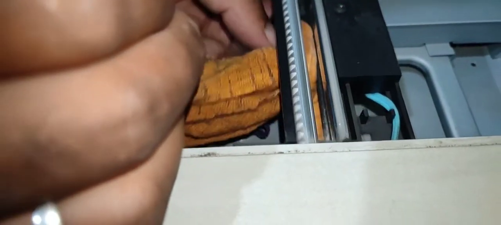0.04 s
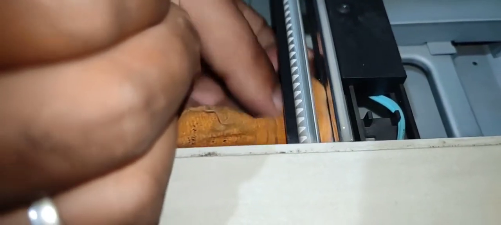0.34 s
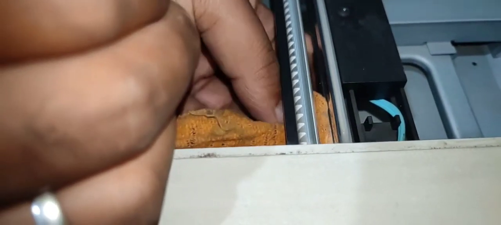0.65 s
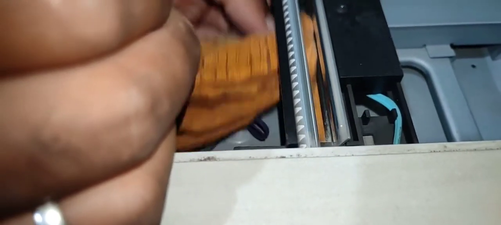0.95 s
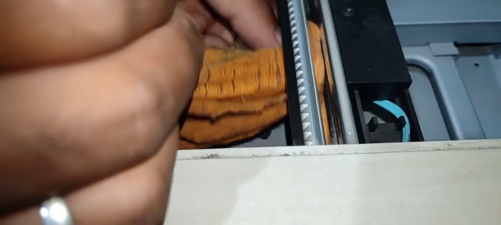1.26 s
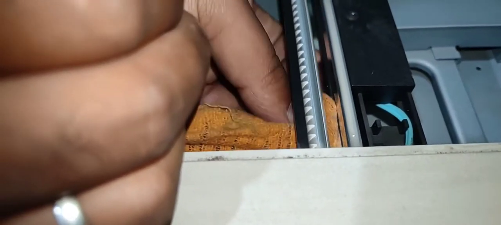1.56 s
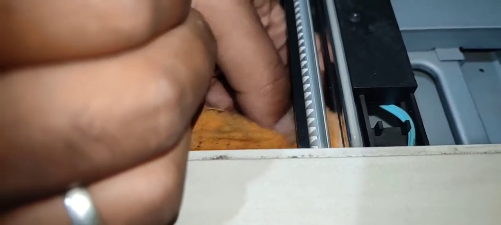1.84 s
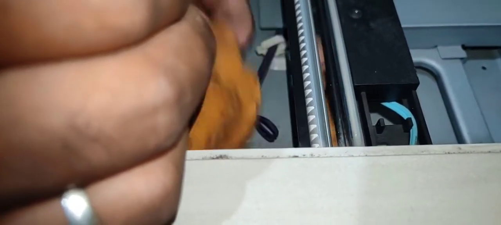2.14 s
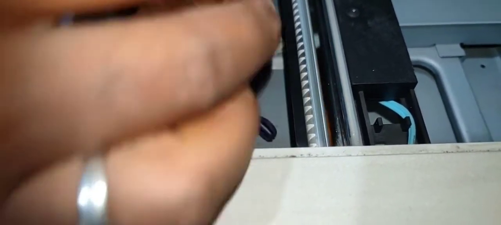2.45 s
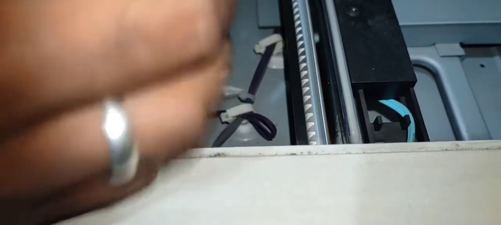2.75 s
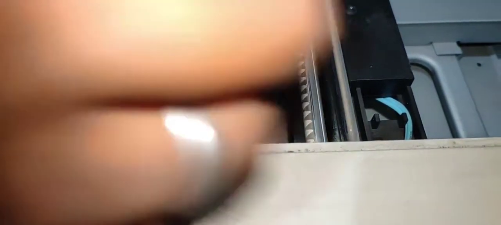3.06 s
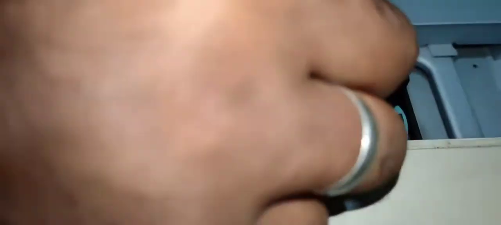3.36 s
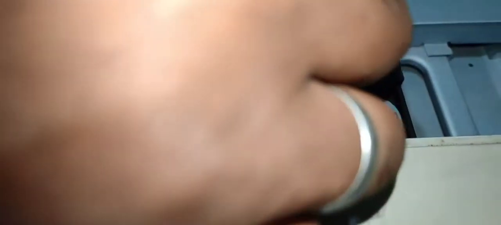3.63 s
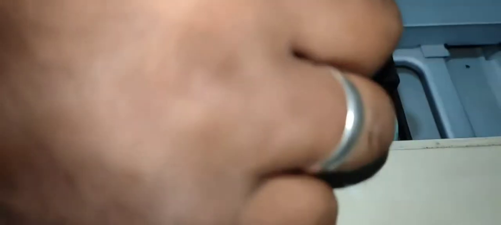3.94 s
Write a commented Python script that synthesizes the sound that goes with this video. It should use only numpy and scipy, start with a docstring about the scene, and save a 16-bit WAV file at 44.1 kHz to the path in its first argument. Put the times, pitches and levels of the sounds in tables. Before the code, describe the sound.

Three plastic knocks and cloth swishes inside an office machine, then faint rustling over a hum.

```python
"""A cloth is pushed to and fro inside an opened copier, close to the microphone.
A motor, perhaps a room fan, hums from the start and throughout. Three firm strokes come about half a
second apart: each knocks a loose plastic part against the chassis, then rubs on between the hollow walls.
The first ends in a light tick. From 1.6 s the cloth is drawn out, with faint rustles and a tick at 2.4 s."""
import sys
import numpy as np
from scipy import signal
from scipy.fft import rfft, irfft, next_fast_len
from scipy.io import wavfile
from scipy.ndimage import map_coordinates

SR = 44100
rng = np.random.default_rng(int(sys.argv[2]) if len(sys.argv) > 2 else 0)


def digitize_waveform(pressure):
    """Quantize a signal to 16-bit integers and store it at the path in sys.argv[1].

    Rows of a 2-D input are taken as channels; values are limited to [-1, 1].
    """
    field = np.atleast_2d(pressure).T
    bounded = np.clip(field, -1, 1)
    quanta = np.round(bounded * 32767).astype(np.int16)
    wavfile.write(sys.argv[1], SR, quanta)


N = 4 * SR


def amp(db):
    """Decibels to gain."""
    return 10 ** (np.asarray(db) / 20)


def unit(x):
    """Normalise to rms 1."""
    return x / np.sqrt(np.mean(x ** 2) + 1e-20)


def along(points, hz):
    """Read a curve of (Hz, value) points on a log frequency axis."""
    freqs, values = np.transpose(points)
    return np.interp(np.log(hz + 1), np.log(freqs + 1), values)


def wobble(per_s):
    """Smooth random modulation with per_s new values a second."""
    return map_coordinates(rng.standard_normal(int(N * per_s / SR) + 4), [np.arange(N) * per_s / SR])


def fade(t, t60):
    """Exponential decay, 60 dB down after t60 seconds."""
    return np.exp(-np.log(1000) * t / t60)


def add(out, start, sound):
    """Mix a sound in at start seconds."""
    part = out[:, max(round(start * SR), 0):][:, :sound.shape[-1]]
    part += sound[..., :part.shape[1]]


def equalise(x, response):
    """Apply an EQ given as gain against frequency."""
    size = x.shape[-1]
    padded = next_fast_len(size + 4096)
    return irfft(rfft(x, padded) * response(np.fft.rfftfreq(padded, 1 / SR)), padded)[..., :size]


# Stereo image. Each row: frequency in Hz, left-right correlation.
STEREO_LIKENESS = [(30, 0.89), (120, 0.76), (330, 0.8), (700, 0.27), (1300, 0)]
def width(hz):
    """Mid-side angle in radians: narrow bass, wide treble."""
    return np.arccos(along(STEREO_LIKENESS, hz)) / 2


def coloured(white_pair, spectrum, tilt_db=0):
    """Shape two white signals into stereo of rms 1, tilted by tilt_db per octave above 1 kHz."""
    def response(hz):
        gain = amp(along(spectrum, hz) + tilt_db * np.log2(np.maximum(hz, 1000) / 1000))
        return gain * [np.cos(width(hz)), np.sin(width(hz))]
    mid, side = equalise(white_pair, response)
    return unit(np.array([mid + side, mid - side]))


# The motor's swells. Each row: time in seconds, fundamental in dB, octave in dB.
HUM_SWELLS = [(0, -56, -46), (.32, -70, -54.5), (.48, -55, -44.5), (.62, -51.5, -51.5), (1.02, -48, -43.5),
              (1.35, -44.5, -46.5), (1.551, -47.5, -49), (1.85, -52.5, -47.5), (2.38, -49.5, -44),
              (2.6, -50, -44.5), (2.87, -64, -39), (3.19, -53, -47.5), (3.37, -57, -42.5),
              (3.63, -73, -51.5), (3.88, -73, -41.5)]
# Its upper tones. Each row: frequency in Hz, level in dB.
UPPER_TONES = [(214.8, -55.5), (286, -57), (294.5, -59), (360.5, -61), (728, -72.5), (1191, -76.5)]
# A small fader lift on those tones. Each row: time in seconds, gain in dB.
UPPER_LIFT = [(1.25, -2), (1.45, -0.5)]
# Moving air. Each row: frequency in Hz, EQ in dB.
AIR_EQ = [(40, 3), (90, -6), (130, 0.5), (190, -5.5), (290, -3.5), (450, -11.5), (800, -18), (1100, -23.5),
          (2000, -25.5), (4000, -32), (8000, -37), (11000, -41.5)]
HUM_HZ, HUM_DRIFT, WAVER_DB, AIR_DB = 71.7, 0.003, 1.5, -49.5
def motor_hum():
    """Two low motor tones swell and sink under weaker wavering ones, on a bed of moving air."""
    def drifting_phase(hz):
        return 2 * np.pi * hz * np.cumsum(1 + HUM_DRIFT * wobble(per_s=3.985)) / SR
    t = np.arange(N) / SR
    times, fundamental_db, octave_db = np.transpose(HUM_SWELLS)
    phase = drifting_phase(HUM_HZ)
    tones = amp(np.interp(t, times, fundamental_db)) * np.sin(phase)
    tones += amp(np.interp(t, times, octave_db)) * np.sin(2 * phase)
    lift_db = np.interp(t, *np.transpose(UPPER_LIFT))
    for hz, db in UPPER_TONES:
        gain = amp(db + lift_db + WAVER_DB * wobble(per_s=9.4))
        tones += gain * np.sin(drifting_phase(hz) + 2 * np.pi * rng.random())
    air = amp(AIR_DB) * coloured(rng.standard_normal((2, N)), AIR_EQ)
    return np.sqrt(2) * tones + air


# Room decay. Each row: frequency in Hz, T60 in seconds.
ROOM_DECAY = [(200, 0.4), (12000, 0.33)]
def room(x):
    """A small room's dark reverb tail, the treble dying first."""
    hz, t, bands = signal.stft(rng.standard_normal((2, SR * 2 // 3)), SR, nperseg=256)
    tail = signal.istft(bands * fade(t, along(ROOM_DECAY, hz)[:, None]), SR, nperseg=256)[1]
    tail = coloured(tail, [(100, -1.5), (15000, -21.5)]) / np.sqrt(tail.shape[1])
    return signal.fftconvolve(x, tail, axes=1)[:, :N]


def hollow(x, echo_db=-4, t60=0.027):
    """Echoes between the machine's close walls add fine resonances, different left and right."""
    t = np.arange(SR // 20) / SR
    walls = rng.standard_normal((2, len(t))) * fade(t, t60)
    walls /= np.linalg.norm(walls, axis=1, keepdims=True)
    echo = signal.fftconvolve(x, walls, axes=1)[:, :N]
    return (x + amp(echo_db) * echo) / np.hypot(1, amp(echo_db))


FIBRES_PER_S, FIBRE_SHARE = 700, 0.25
def friction(spectrum, size, tilt_db=0):
    """A haze of tiny slips, with the grain of single fibres catching."""
    haze, catches = rng.standard_normal((2, 2, size))
    catches = unit(catches * (rng.random(size) < FIBRES_PER_S / SR))
    return coloured(np.sqrt(1 - FIBRE_SHARE) * haze + np.sqrt(FIBRE_SHARE) * catches, spectrum, tilt_db)


def rub(length, spectrum, tilt_db, rise_s, fall_s, arch_db=0):
    """One short stroke, arch_db louder in the middle, where the hand moves fastest."""
    t = np.arange(SR // 2) / SR
    gate = np.minimum(t / rise_s, 1) * np.exp(-(np.maximum(t - length, 0) / fall_s) ** 2)
    arch = np.sin(np.pi * np.clip(t / length, 0, 1)) - 1
    return friction(spectrum, len(t), tilt_db) * gate * amp(arch_db * arch)


# The hand's effort through three firm wipes. Each row: time in seconds, level in dB.
WIPE_LEVEL = [(0, -55.5), (.17, -49.5), (.28, -50.5), (.33, -56.5), (.39, -77.5), (.55, -70), (.61, -56.5),
              (.77, -50), (.925, -53.5), (.97, -69.5), (1.008, -69), (1.036, -51), (1.18, -55),
              (1.25, -50.5), (1.34, -47.5), (1.43, -50), (1.47, -63), (1.57, -79)]
# Light brushes of cloth and hand, and fingers scuffing the plastic.
# Each row: start in seconds, length in seconds, level in dB, treble tilt in dB per octave.
BRUSH_CUES = [(1.598, 0.11, -60, -6), (1.712, 0.29, -59, 1), (2.05, 0.041, -62, 7), (2.277, 0.13, -55, 2.5),
              (2.41, 0.13, -63.5, 1.5), (2.508, 0.24, -59.5, -1.5), (2.789, 0.067, -65, 2),
              (2.911, 0.061, -61.5, 1.5), (3.066, 0.21, -61, -1), (3.295, 0.11, -63.5, 2),
              (3.409, 0.12, -64, 1), (3.722, 0.095, -67, 1)]
SCUFF_CUES = [(0.556, 0.0094, -40, 1), (0.633, 0.032, -48.5, 10.5), (0.741, 0.01, -48.5, 5.5),
              (1.74, 0.041, -57, 8), (3.569, 0.078, -58, 8.5)]
# Bright wipe, airy brush, dull scuff. Each row: frequency in Hz, EQ in dB.
WIPE_EQ = [(500, -5), (2400, -11.5), (3300, -4.5), (5200, -2), (6600, 0), (7900, 3.5), (9100, -10),
           (15000, -16)]
BRUSH_EQ = [(300, -4), (2500, -1.5), (7800, 4.5), (9300, -6), (15000, -7)]
SCUFF_EQ = [(150, 0), (300, 15.5), (700, 9), (1500, -4), (4200, -15), (15000, -62)]
DRAG_DB, RASP_DB = 0.9, 1.6
def cloth():
    """Wipes, brushes and scuffs, all with an uneven drag and the fast rasp of the weave."""
    effort = amp(np.interp(np.arange(N) / SR, *np.transpose(WIPE_LEVEL)))
    out = effort * friction(WIPE_EQ, N)
    for start, length, db, tilt_db in BRUSH_CUES:
        brush = rub(length, BRUSH_EQ, tilt_db, rise_s=0.009, fall_s=0.029, arch_db=7.5)
        add(out, start, amp(db) * brush)
    for start, length, db, tilt_db in SCUFF_CUES:
        scuff = rub(length, SCUFF_EQ, tilt_db, rise_s=0.005, fall_s=0.02)
        add(out, start, amp(db) * scuff)
    return out * amp(DRAG_DB * wobble(per_s=34.94) + RASP_DB * wobble(per_s=260))


def burst(spectrum, t60, tilt_db=0):
    """Many close modes struck at once: decaying coloured noise, equally strong left and right."""
    t = np.arange(SR // 6) / SR
    decay = fade(t, t60)
    sound = coloured(rng.standard_normal((2, len(t))), spectrum, tilt_db) * decay
    return sound * np.linalg.norm(decay) / np.linalg.norm(sound, axis=1, keepdims=True)


# Light ticks. Each row: start in seconds, level in dB, treble tilt in dB per octave.
TICK_CUES = [(.353, -49, 9.5), (2.3971, -39, -0.5)]
# Their colour. Each row: frequency in Hz, EQ in dB.
TICK_EQ = [(400, 0), (2400, 0), (4200, -3), (14000, -30)]
def ticks():
    """Two light plastic ticks: one as the first wipe ends, one at 2.4 s."""
    out = np.zeros((2, N))
    for start, db, tilt_db in TICK_CUES:
        add(out, start, amp(db) * burst(TICK_EQ, t60=0.03, tilt_db=tilt_db))
    return out


# Modes of the plastic part and chassis. Each row: frequency in Hz, level in dB, T60 in seconds.
BODY_MODES = [(191.4, -11, 0.44), (277.4, -2, 0.073), (365.3, -1.5, 0.13), (535, -13.5, 0.14),
              (695, -5.5, 0.069), (790, -21.5, 0.13), (1192, -18.5, 0.17), (1580, -18, 0.16),
              (1744, -19, 0.14), (2070, -6.5, 0.027), (3280, -18.5, 0.072)]
FLEX_BELOW_HZ, FAVOUR_DB, RING_SPREAD_DB, RING_RISE_S = 310, 13, 2, 0.0037
def ring(flex_db, favoured_hz):
    """The body rings, one mode favoured by the spot struck; higher modes spread wider in stereo."""
    t = np.arange(SR // 2) / SR
    out = np.zeros((2, len(t)))
    nearest_hz = min(BODY_MODES, key=lambda mode: abs(mode[0] - favoured_hz))[0]
    for hz, db, t60 in BODY_MODES:
        phase_skew = width(hz) * rng.choice([-1, 1]) * np.array([[1], [-1]])
        db += flex_db * (hz < FLEX_BELOW_HZ) + FAVOUR_DB * (hz == nearest_hz)
        db -= RING_SPREAD_DB * rng.standard_normal()
        out += amp(db) * np.sin(2 * np.pi * (hz * t + rng.random()) + phase_skew) * fade(t, t60)
    return out * (1 - np.exp(-t / RING_RISE_S))


# The panel's thud and the contact's crack. Each row: frequency in Hz, EQ in dB.
THUD_EQ = [(80, -39), (150, -6.5), (230, 3), (500, 3.5), (800, -2), (1900, -8.5), (3000, -23), (15000, -30)]
CRACK_EQ = [(200, 31.5), (1000, 13), (2000, 5.5), (3400, 9), (5200, -3.5), (7700, -3), (9000, -16),
            (15500, -42)]
THUD_TRIM_DB, SNAP_DB = -0.5, 4
def contact(thud_db, crack_db, tilt_db):
    """Plastic meets chassis: a thud of dense panel modes under a crack with a short snap."""
    thud = burst(THUD_EQ, t60=0.046)
    crack = burst(CRACK_EQ, t60=0.039, tilt_db=tilt_db)
    snap = amp(SNAP_DB) * burst(CRACK_EQ, t60=0.017, tilt_db=5.5)
    return amp(thud_db + THUD_TRIM_DB) * thud + amp(crack_db) * (crack + snap)


# One knock a stroke. Each row: start in seconds, thud, crack and ring in dB, gain of the low flexing
# modes in dB, crack tilt in dB per octave, rebound delay in seconds, rebound in dB, favoured mode in Hz.
KNOCK_CUES = [(0.0409, -24.5, -30.5, -25, 6.5, 11.5, 0.0063, -20, 2070),
              (0.575, -29, -29, -23, -1, 7.5, .018, -3.5, 3280),
              (1.0675, -24.5, -32, -22, -2.5, 8.5, 0.013, -21, 790)]
# Chatter as the part seats. Each row: delay in seconds, thud offset in dB, crack offset in dB.
SEATING_CHATTER = [(0, 0.5, -9), (.0025, -4.5, 0.5), (.0070, -16, -0.5)]
ROOM_DB, PANEL_CUT_HZ = -10.5, 170  # small panels radiate little below the cut
def loose_part():
    """The part hits its stop, chatters, rebounds once and rings on; hits and ticks feed the room."""
    hits, ringing = np.zeros((2, 2, N))
    for knock in KNOCK_CUES:
        start, thud_db, crack_db, ring_db, flex_db, tilt_db, rebound_s, rebound_db, favoured_hz = knock
        add(ringing, start, amp(ring_db) * ring(flex_db, favoured_hz))
        last_thud_offset = SEATING_CHATTER[-1][1]
        rebound = (rebound_s, rebound_db + last_thud_offset, rebound_db)
        for delay, thud_offset, crack_offset in [*SEATING_CHATTER, rebound]:
            add(hits, start + delay, contact(thud_db + thud_offset, crack_db + crack_offset, tilt_db))
    hits += ticks()
    low_cut = signal.butter(4, PANEL_CUT_HZ, "highpass", fs=SR, output="sos")
    return signal.sosfilt(low_cut, ringing + hits + amp(ROOM_DB) * room(hits))


def scene():
    """The knocking part and the cloth inside the machine, over the motor's hum."""
    return loose_part() + motor_hum() + hollow(cloth())


# Microphone balance. Each row: frequency in Hz, left over right in dB.
MIC_BALANCE = [(140, -1.4), (300, 1.8), (3000, -2.4)]
TOP_HZ = 15650
def record(dry):
    """The microphone colours left and right slightly differently; the very top is cut off."""
    sides = np.array([[0.5], [-0.5]])
    return equalise(dry, lambda hz: amp(along(MIC_BALANCE, hz) * sides) * (hz < TOP_HZ))


dry = scene()
out = record(dry)
digitize_waveform(out)
```